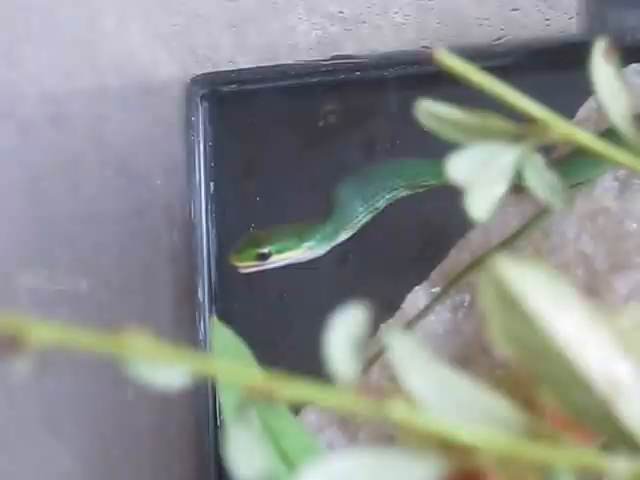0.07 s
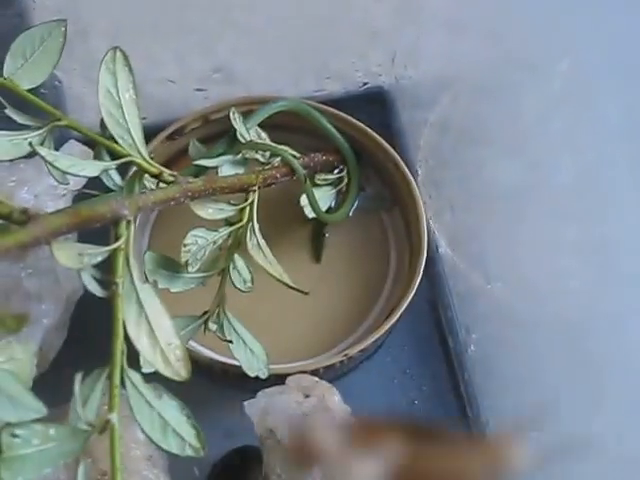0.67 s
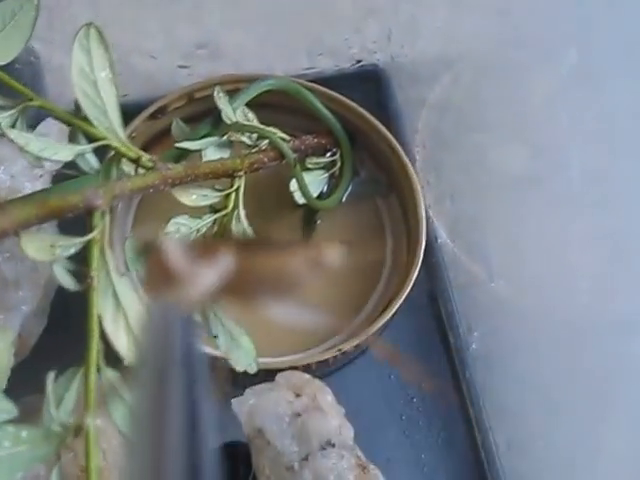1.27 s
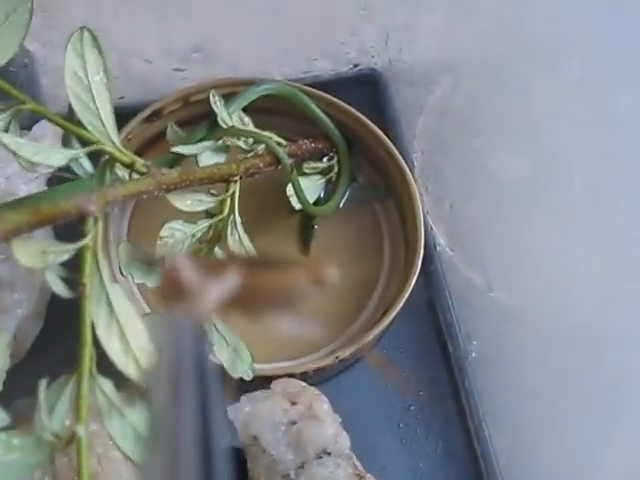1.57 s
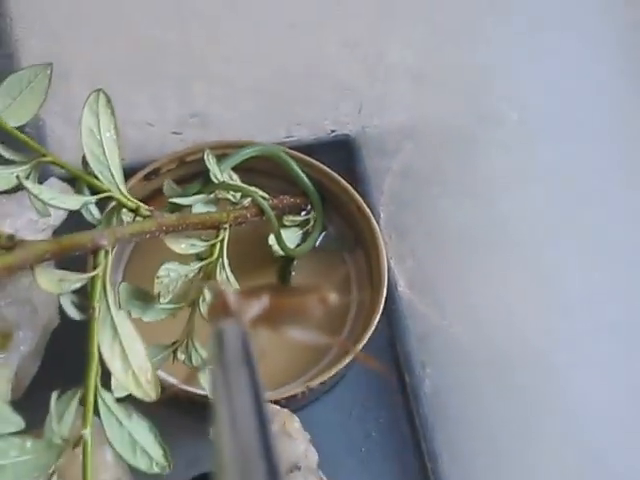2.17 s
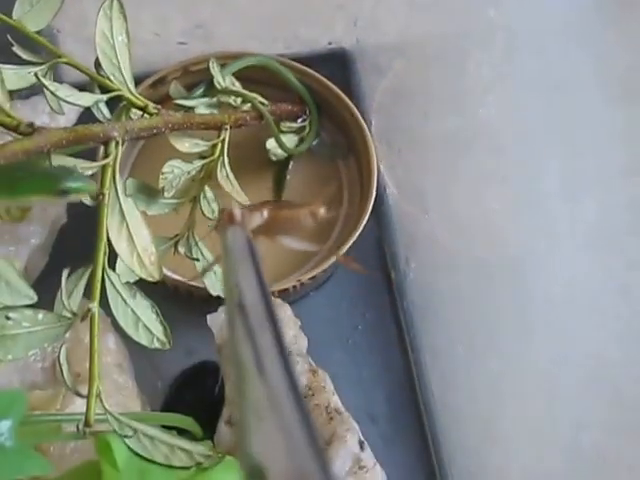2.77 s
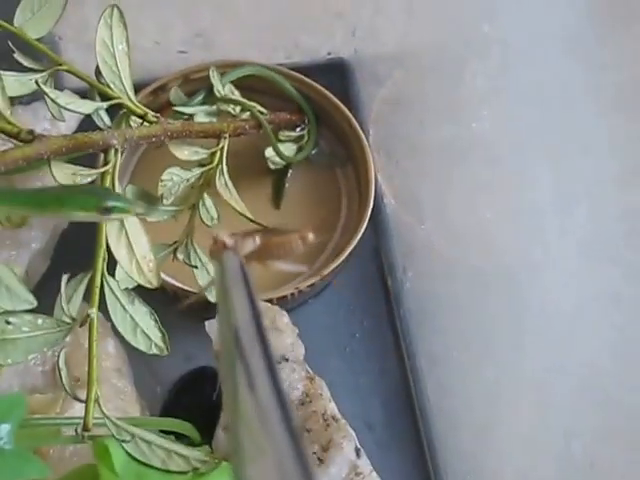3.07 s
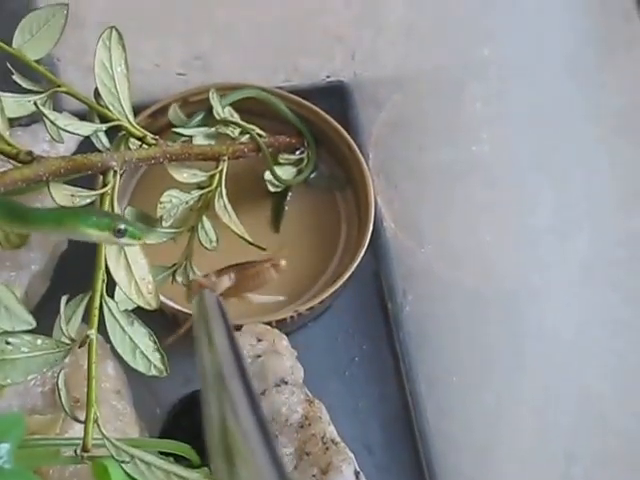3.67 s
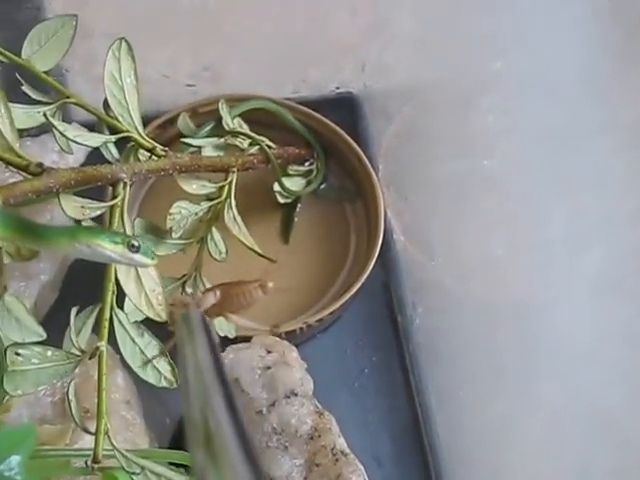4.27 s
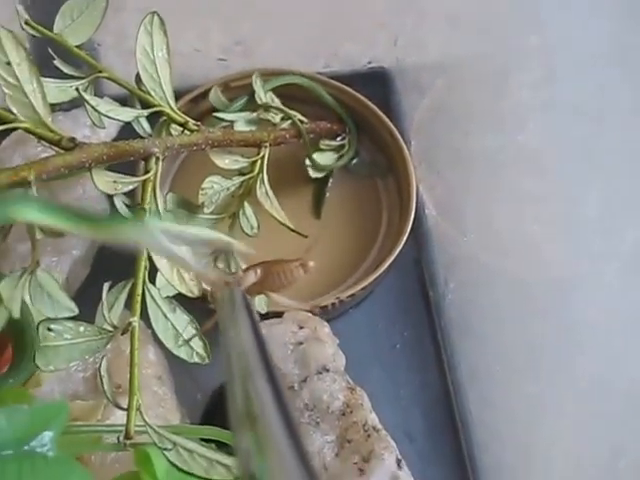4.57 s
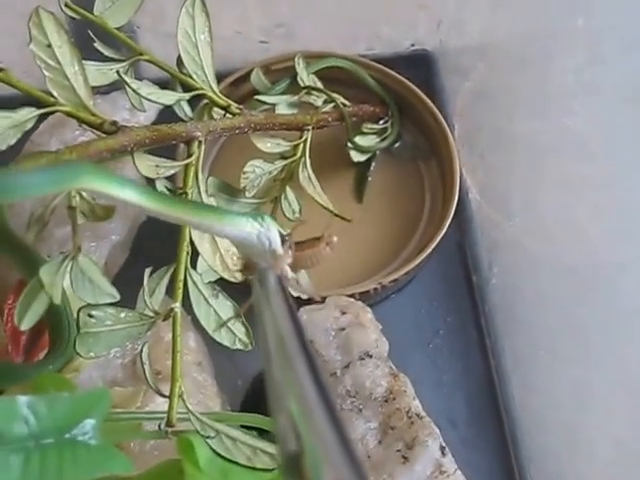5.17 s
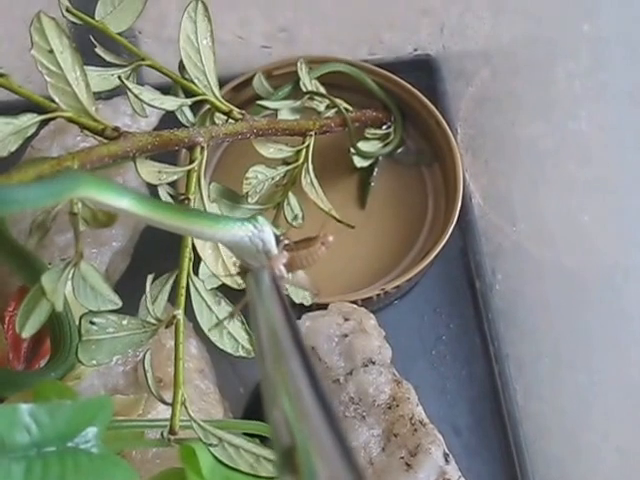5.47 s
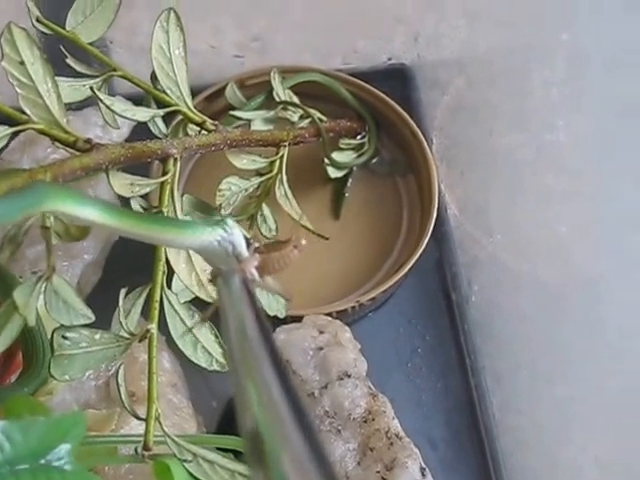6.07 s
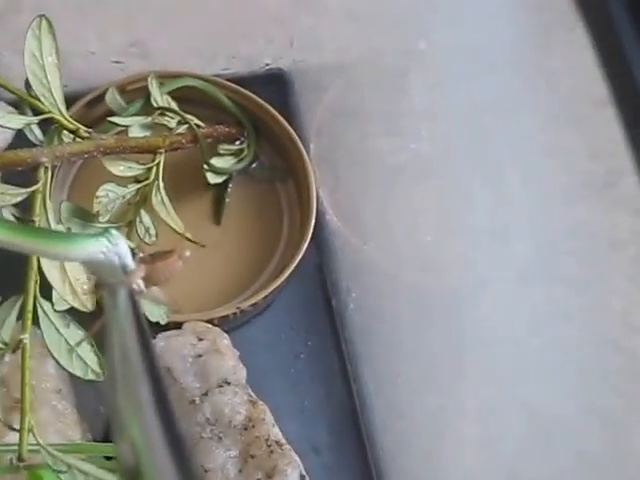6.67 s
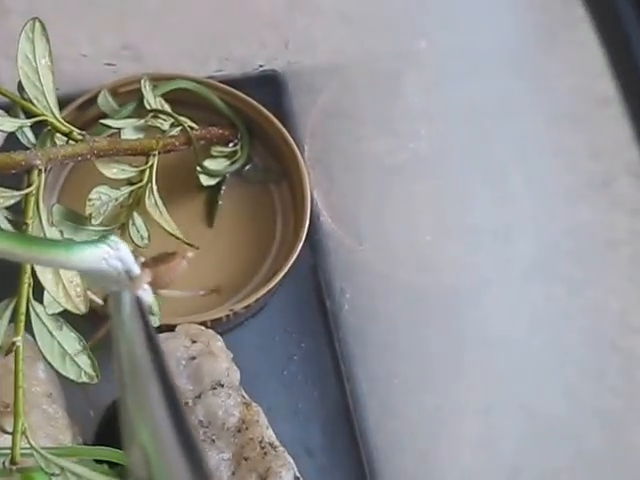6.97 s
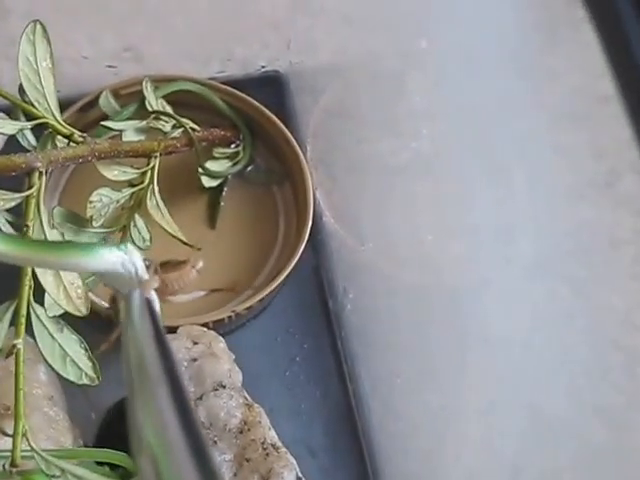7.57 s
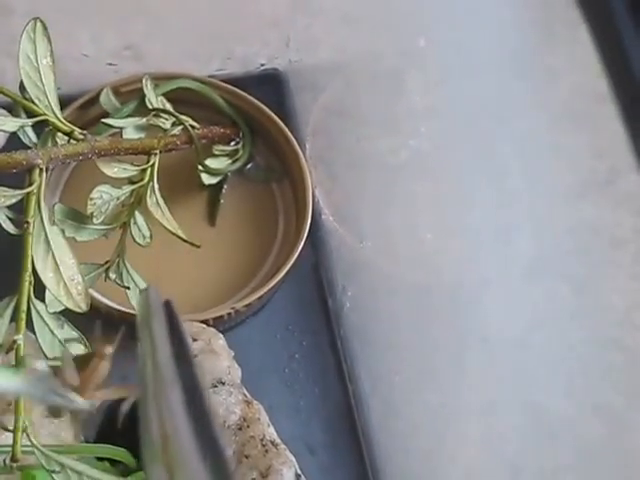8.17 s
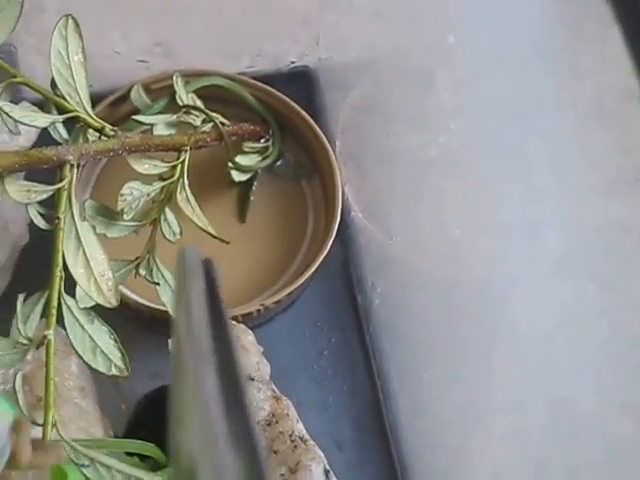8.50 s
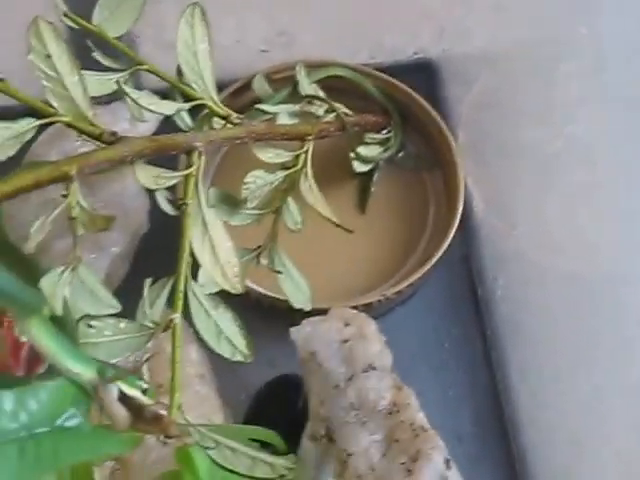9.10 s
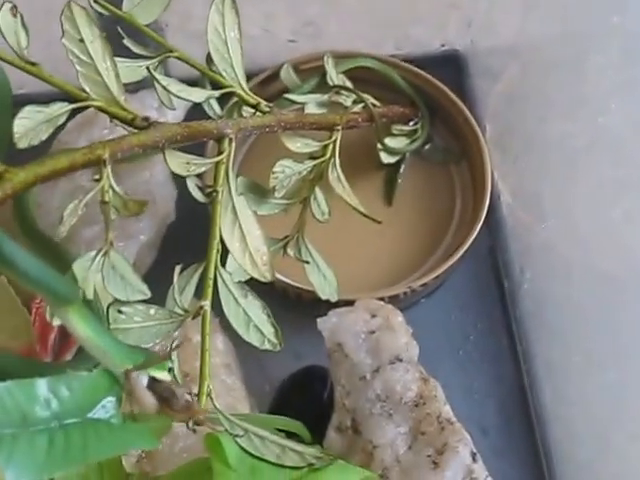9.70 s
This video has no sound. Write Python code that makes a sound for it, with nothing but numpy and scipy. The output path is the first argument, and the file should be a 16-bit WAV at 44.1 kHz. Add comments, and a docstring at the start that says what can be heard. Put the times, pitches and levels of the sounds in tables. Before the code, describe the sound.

Faint rustling and tiny crunches of a snake feeding, between a light knock and a sharp ringing clatter of metal tongs on a tank.

```python
"""A thin squeak and a few dry clicks sound over steady ventilation in a quiet room. Then, close to the
microphone, a snake takes a cricket from metal tongs in a small tank. The tongs knock once going in and
clatter coming out; each contact is a noise clack plus the ringing of tank and steel blades. In between
come soft bumps, tiny fractures of shell and dry leaves as the snake grips and pulls, and faint rustling."""
import sys
import numpy as np
from scipy import signal
from scipy.fft import rfft, irfft, next_fast_len
from scipy.io import wavfile
from scipy.ndimage import map_coordinates

SR = 44100
rng = np.random.default_rng(int(sys.argv[2]) if len(sys.argv) > 2 else 0)


def generate_wav(signal):
    """Clip the signal to [-1, 1] and save it as 16-bit WAV at the path in sys.argv[1]."""
    frames = np.transpose(np.atleast_2d(signal))
    scaled = np.clip(frames, -1, 1) * 32767
    pcm = np.round(scaled).astype(np.int16)
    wavfile.write(sys.argv[1], SR, pcm)


N = 433944


def amp(db):
    """Decibels to gain."""
    return 10 ** (np.asarray(db) / 20)


def unit_rms(x):
    """Scale to rms 1."""
    return x / np.sqrt(np.mean(x ** 2) + 1e-20)


def curve_gain(points, hz):
    """Gain of (f/Hz, level/dB) points joined on a log frequency axis."""
    points_hz, points_db = np.transpose(points)
    return amp(np.interp(np.log(hz + 1), np.log(points_hz), points_db))


def bell(hz, centre_hz, width_hz):
    """Gain of one resonance."""
    return 1 / (1 + (2 * (hz - centre_hz) / width_hz) ** 2)


def filtered(x, response):
    """Apply a frequency response by FFT."""
    size = next_fast_len(len(x) + 8192)
    return irfft(rfft(x, size) * response(np.fft.rfftfreq(size, 1 / SR)), size)[:len(x)]


def noise(size, response):
    """Coloured noise of rms 1."""
    return unit_rms(filtered(rng.standard_normal(size), response))


def burst(envelope, response):
    """Coloured noise under an envelope, with the envelope's energy."""
    return unit_rms(noise(len(envelope), response) * envelope) * np.sqrt(np.mean(envelope ** 2))


def wobble(knots_per_s):
    """Smooth random curve."""
    knots = rng.standard_normal(int(N * knots_per_s / SR) + 4)
    return map_coordinates(knots, [np.arange(N) * knots_per_s / SR])


def swell(centre_s, sigma_s):
    """Gaussian envelope of peak 1."""
    return np.exp(-.5 * ((np.arange(N) / SR - centre_s) / sigma_s) ** 2)


def add(track, start_s, sound):
    """Mix a sound into the track."""
    part = track[max(round(start_s * SR), 0):][:len(sound)]
    part += sound[:len(part)]


# Tongs on tank: t/s, level/dB, corner/Hz, ring re clack/dB, place (0 wall, 1 rim), shove lag/s,
# rebound flight/s, rebound loss/dB
TONG_KNOCKS = [(2.8585, -19.5, 6150, -7, 0.078, .0022, .0248, 8.5),
               (8.9196, -6.5, 3930, -10, 0.94, 0.00181, 0.019, 15),
               (8.9820, -14, 4640, -3, 0.84, 0.0082, 0.039, 14.5)]


def blows(rebound_corner_ratio=0.86):
    """Each knock and its one weaker rebound. Rows: t/s, level/dB, corner/Hz, ring/dB, place."""
    rows = []
    for t_s, db, corner_hz, ring_db, place, _, flight_s, loss_db in TONG_KNOCKS:
        rows.append((t_s, db, corner_hz, ring_db, place))
        rows.append((t_s + flight_s, db - loss_db, corner_hz * rebound_corner_ratio, ring_db, place))
    return rows


# Soft bumps on the tank wall: t/s, level/dB
WALL_BUMPS = [(3.464, -34.5), (3.573, -42.5), (4.366, -40.5), (6.658, -44), (7.551, -42), (7.698, -44),
              (8.075, -43)]


def contacts(touch_lead_s=0.0017, touch_db=-7.5, touch_hz=8950,
             shove_db=-5, wall_shove_hz=1160, rim_shove_hz=2700, wall_give_db=11,
             bump_hz=520, bump_ring_db=2.5, bump_place=0.074):
    """Rows of blows(), plus the tip's touch before each knock, the weight's shove after, and bumps."""
    rows = blows()
    for t_s, db, _, ring_db, place, lag_s, _, _ in TONG_KNOCKS:
        # the wall gives way: weaker touch, stronger and duller shove
        give_db = wall_give_db * (1 - place)
        shove_hz = np.interp(place, [0, 1], [wall_shove_hz, rim_shove_hz])
        rows.append((t_s - touch_lead_s, db + touch_db - give_db, touch_hz, ring_db, place))
        rows.append((t_s + lag_s, db + shove_db + give_db, shove_hz, ring_db, place))
    return rows + [(t_s, db, bump_hz, bump_ring_db, bump_place) for t_s, db in WALL_BUMPS]


# Spectrum of the clack and the dense ring between modes: f/Hz, level/dB
CONTACT_SPECTRUM = [(60, -45), (130, -54), (240, -7), (470, -18), (560, -9.5), (860, -15), (1000, 0.5),
                    (1500, -4.5), (2400, -2.5), (3000, -8.5), (5600, -13.5), (7000, -20.5), (15000, -22)]


def tank_knocks(clack_t60_s=0.028, rise_s=0.00021, tail_db=-16, low_t60_s=0.36, high_t60_s=0.23,
                split_hz=1700, flex_db=9, flex_hz=380, leak_db=-20, low_cut_hz=140):
    """Each contact is a short clack and a dense ring whose treble dies first."""
    out, t = np.zeros(N), np.arange(SR // 2) / SR
    lows = lambda f: 1 / (1 + (f / split_hz) ** 2)
    for t_s, db, corner_hz, ring_db, place in contacts():
        # the wall flexes more than the stiff rim: more bass
        bass = lambda f: amp(flex_db * (1 - place) / (1 + (f / flex_hz) ** 4))
        colour = lambda f: curve_gain(CONTACT_SPECTRUM, f) * bass(f)
        clack = burst(amp(-60 * t / clack_t60_s), colour)
        ring = burst(amp(tail_db - 60 * t / low_t60_s), lambda f: colour(f) * lows(f))
        ring += burst(amp(tail_db - 60 * t / high_t60_s), lambda f: colour(f) * (1 - lows(f)))
        blow = (clack + amp(ring_db) * ring) * (1 - np.exp(-t / rise_s))
        softness = signal.butter(2, corner_hz, fs=SR)  # softer contact: less treble
        add(out, t_s, amp(db) * (signal.lfilter(*softness, blow) + amp(leak_db) * blow))
    # the knocks carry almost no deep bass
    return signal.lfilter(*signal.butter(2, low_cut_hz, 'highpass', fs=SR), out)


# Tank modes: f/Hz, level struck on wall/dB, level struck on rim/dB, t60/s
TANK_MODES = [(172.6, -18, -23, 0.39), (237, -13, -32, 0.13), (259, -13, -37, 0.29), (340, -16, -31, 0.39),
              (378, -37, -8, 0.2), (414, -15, -17, 0.19), (462, 0, -5, 0.17), (616, -68, -12.5, 0.27),
              (938, -4, -11, 0.16), (1013, 4, -9, 0.12), (1157, -45, -3, 0.25), (1220, -22, -6, 0.2),
              (1250, -35, -38, 0.18), (1310, -15, -19, 0.14), (1403, -44, -9, 0.3),
              (1435, -10.5, -13, 0.24), (1700, -10, -14, 0.077), (1900, -21, -19, 0.25),
              (1950, -9, -21, 0.17), (2060, -23, -7.5, 0.12), (2310, -15, -13, 0.12),
              (2454, -23, -5, 0.086), (2500, -9, -24, 0.11), (2665, -26, -10, 0.12), (2980, -35, -19, 0.15),
              (3630, -8, -17, 0.089), (4000, -33, 2.5, 0.027)]


def tank_ring(gain_db=-2, build_cycles=3.1):
    """Contacts feed energy to the modes by place and hardness; each mode builds up, then decays."""
    out, t = np.zeros(N), np.arange(SR // 2) / SR
    for hz, wall_db, rim_db, t60_s in TANK_MODES:
        envelope = amp(-60 * t / t60_s) * (1 - np.exp(-t * hz / build_cycles))
        energy = np.zeros(N)
        for t_s, db, corner_hz, ring_db, place in contacts():
            mode_db = wall_db + place * (rim_db - wall_db)
            drive = amp(db + ring_db + mode_db + rng.standard_normal())
            add(energy, t_s, (drive * envelope) ** 2 / (1 + (hz / corner_hz) ** 4))
        live = np.flatnonzero(energy)
        out[live] += np.sqrt(energy[live]) * np.sin(2 * np.pi * (hz * live / SR + rng.random()))
    return amp(gain_db) * out


# Blade clinks, blade against blade except the last, where the tongs bounce against the tank: t/s, level/dB,
# excited band centre/Hz
BLADE_CLINKS = [(4.592, -52, 3200), (7.560, -56, 3000), (7.757, -56, 3200), (7.849, -50.5, 3480),
                (8.059, -51, 4400), (9.003, -30.5, 5700)]
# Blade modes: f/Hz, level/dB, t60/s
BLADE_MODES = [(1934, 4, .14), (2630, 2.5, 0.11), (3350, -2.5, 0.13), (3860, -2, 0.073), (4060, -11, 0.061),
               (5276, -0.5, 0.046), (5240, 1.5, 0.017), (13900, -4, .07)]


def tong_clinks(width_hz=2200, struck_hz=5500, struck_db=-13):
    """Hand-damped steel blades ring briefly on touching each other or striking the tank."""
    out, t = np.zeros(N), np.arange(SR // 4) / SR
    hz, mode_db, t60_s = np.transpose(BLADE_MODES)[:, :, None]
    envelopes = amp(mode_db - 60 * t / t60_s)
    tank_strikes = [(t_s, db + struck_db, struck_hz) for t_s, db, *_ in blows()]
    for t_s, db, centre_hz in list(BLADE_CLINKS) + tank_strikes:
        phase = rng.uniform(0, 2 * np.pi, hz.shape)
        modes = bell(hz, centre_hz, width_hz) * envelopes * np.sin(2 * np.pi * hz * t + phase)
        add(out, t_s, amp(db) * modes.sum(axis=0))
    return out


# Fractures of cricket shell and dry leaves: t/s, level/dB, body level/dB
FRACTURES = [(3.7369, -37, -28), (4.4722, -38, -13), (4.483, -37, -13), (4.566, -35, -18), (4.59, -29, -22),
             (4.6513, -32.5, -24), (4.7082, -33, -25), (4.7544, -30, -22), (4.8429, -40, -18),
             (5.016, -33.5, -21), (5.123, -36.5, -10.5), (6.9476, -34, -14), (7.0624, -38, -12),
             (7.107, -30, -19), (8.0581, -36, -5.5), (8.1529, -40, -10), (8.7515, -35, -21),
             (9.1304, -39, -9), (9.144, -33, -9.5), (9.7867, -39, -28)]


def crackles(snap_t60_s=0.014, snap_base_hz=10000, fall_hz_per_db=162, snap_width_hz=4200,
             tail_db=-19, tail_t60_s=0.087, body_gain_db=6, body_hz=4800, body_width_hz=4100,
             faint_db=-42, faint_spread_db=2, faint_body_db=-18, body_spread_db=4, gain_db=-6):
    """Tiny fractures: a high snap, a lower body and a short scatter from the walls."""
    out, t = np.zeros(N), np.arange(SR // 20) / SR
    envelope = amp(-60 * t / snap_t60_s) + amp(tail_db - 60 * t / tail_t60_s)
    # faint random ticks while the leaves move
    ticks_per_s = sum(rate * swell(t_s, sigma_s) for t_s, sigma_s, _, rate in LEAF_MOVES)
    tick_times_s = np.flatnonzero(rng.random(N) < ticks_per_s / SR) / SR
    ticks = [(t_s, rng.normal(faint_db, faint_spread_db), rng.normal(faint_body_db, body_spread_db))
             for t_s in tick_times_s]
    for t_s, db, body_db in list(FRACTURES) + ticks:
        snap_hz = snap_base_hz - fall_hz_per_db * body_db  # more body: lower snap
        snap = burst(envelope, lambda f: bell(f, snap_hz, snap_width_hz))
        body = burst(envelope, lambda f: bell(f, body_hz, body_width_hz))
        add(out, t_s, amp(db + gain_db) * (snap + amp(body_db + body_gain_db) * body))
    return out


# Close dry clicks: t/s, level/dB, f/Hz, time constant/s, body re ping/dB
DRY_CLICKS = [(0.144, -35, 5500, 0.00047, -8), (0.1464, -28, 3850, 0.00065, -3.5),
              (.1472, -43, 13000, 0.00089, -15), (0.1755, -42, 1500, 0.0013, -10),
              (0.1792, -45.5, 4500, 0.0012, 8.5), (0.1825, -35, 4300, 0.00087, -3)]
# Click body spectrum: f/Hz, level/dB
CLICK_SPECTRUM = [(100, -8), (550, 6), (900, 3), (1450, 1), (2500, -12), (5000, -14), (7000, -16),
                  (15000, -26)]


def clicks(width_hz=1100):
    """A narrow noise ping and a broad body swell and stop within a few milliseconds."""
    out, t = np.zeros(N), np.arange(-SR // 50, SR // 50) / SR
    for t_s, db, hz, tau_s, body_db in DRY_CLICKS:
        envelope = amp(db) / np.cosh(np.clip(t / tau_s, -20, 20))
        ping = burst(envelope, lambda f: bell(f, hz, width_hz))
        body = burst(envelope, lambda f: curve_gain(CLICK_SPECTRUM, f))
        add(out, t_s + t[0], ping + amp(body_db) * body)
    return out


def squeak(start_s=0.1175, length_s=0.024, hz=4120, level_db=-44, fade_db=6):
    """A thin, fading tone just before the first click."""
    out, t = np.zeros(N), np.arange(int(length_s * SR)) / SR
    envelope = signal.windows.tukey(len(t), .2) * amp(level_db - fade_db * t / length_s)
    add(out, start_s, envelope * np.sin(2 * np.pi * hz * t))
    return out


# Movements through the leaves: centre t/s, sigma/s, level/dB, peak tick rate/(1/s)
LEAF_MOVES = [(2.45, 0.59, -58.5, 2), (4.486, 0.017, -48.5, 60), (4.61, 0.12, -59, 16),
              (6.857, 0.054, -58, 5), (7.818, .09, -55, 4), (8.35, .25, -66.5, 18), (9.5, 0.31, -60, 20)]
# Brushing spectrum: f/Hz, level/dB
LEAF_SPECTRUM = [(300, -14), (1100, 9), (2000, 1.5), (3800, 0.5), (6500, -5.5), (10000, -9), (14000, -5),
                 (16000, 0)]


def leaf_rustle(grain_db=4, grains_per_s=450):
    """Leaves brush past snake and tongs in short, grainy swells."""
    strokes = sum(amp(db) * swell(t_s, sigma_s) for t_s, sigma_s, db, _ in LEAF_MOVES)
    brushing = noise(N, lambda f: curve_gain(LEAF_SPECTRUM, f))
    grains = amp(grain_db * wobble(grains_per_s))
    return strokes * unit_rms(brushing * grains)


# Ventilation and microphone hiss: f/Hz, level in a 1 Hz band/dB
AIR_SPECTRUM = [(20, -87), (45, -86), (85, -84.5), (160, -84), (290, -80.5), (460, -83), (700, -80.5),
                (1300, -85), (1800, -91), (3400, -94.5), (5400, -98.5), (9000, -102), (12600, -101),
                (15700, -105.5)]
# Resonances in fan noise and hiss: f/Hz, width/Hz, rms level/dB
FAN_RESONANCES = [(86.8, 10, -74.5), (253, 18, -65.5), (338.3, 14, -66.5), (749, 5.9, -67.5),
                  (1313, 60, -75.5), (3235, 200, -72.5), (11760, 910, -70)]
# Electronic whine: f/Hz, rms level/dB
WHINE_LINES = [(10411, -84), (10438, -84), (11316, -84), (15735, -80)]


def room_noise(drift_db=0.36, drift_knots_per_s=2.493):
    """Air noise and fan resonances drift slightly in level over a faint electronic whine."""
    t = np.arange(N) / SR
    air = filtered(rng.standard_normal(N), lambda f: curve_gain(AIR_SPECTRUM, f)) * np.sqrt(SR / 2)
    fan = sum(amp(db) * noise(N, lambda f: bell(f, hz, width_hz)) for hz, width_hz, db in FAN_RESONANCES)
    whine = sum(amp(db) * np.sqrt(2) * np.sin(2 * np.pi * hz * t) for hz, db in WHINE_LINES)
    return amp(drift_db * wobble(drift_knots_per_s)) * (air + fan) + whine


def scene():
    """Mono mix of room, tongs on tank and small dry sounds."""
    background = room_noise()
    tongs = tank_knocks() + tank_ring() + tong_clinks()
    small_sounds = clicks() + squeak() + leaf_rustle() + crackles()
    return (background + tongs + small_sounds)[None]


def record(dry, notch_hz=7900, notch_width_hz=1600, top_hz=15850):
    """Microphone: treble notch, soft clipping, steep band limit."""
    notched = filtered(dry[0], lambda f: 1 - 1 / (1 + 2j * (f - notch_hz) / notch_width_hz))
    clipped = notched / (1 + notched ** 4) ** (1 / 4)
    return filtered(clipped, lambda f: 1 / np.sqrt(1 + (f / top_hz) ** 300))[None]


dry = scene()
out = record(dry)
generate_wav(out)
```